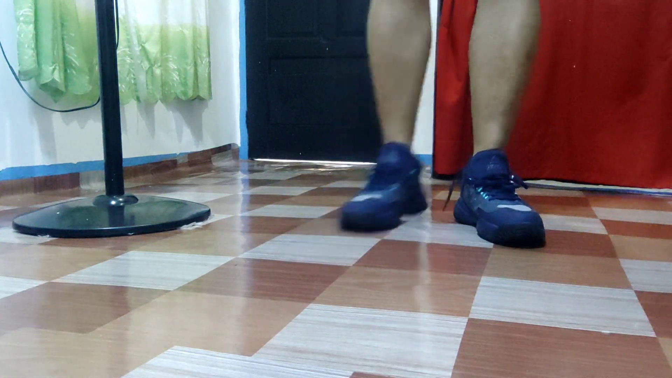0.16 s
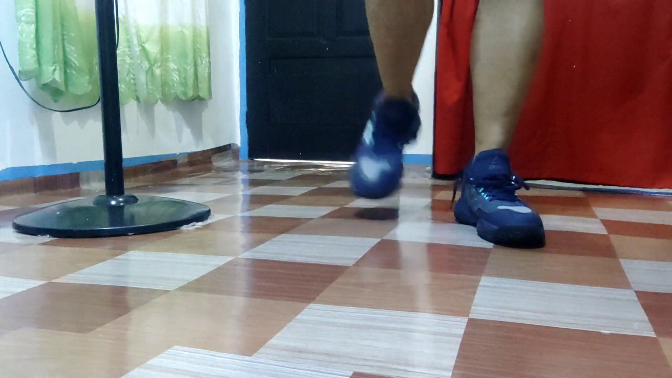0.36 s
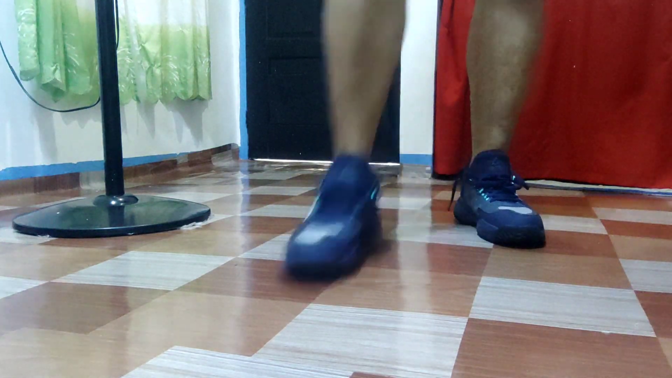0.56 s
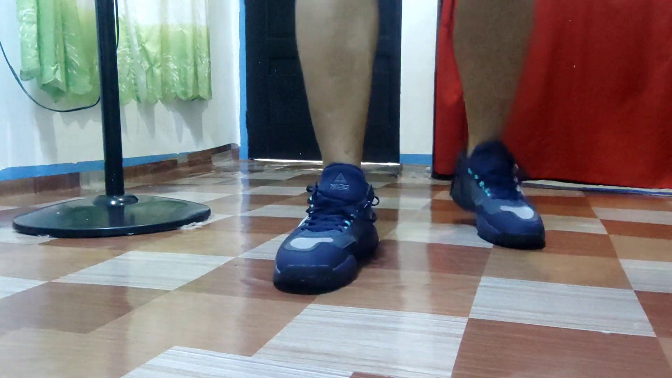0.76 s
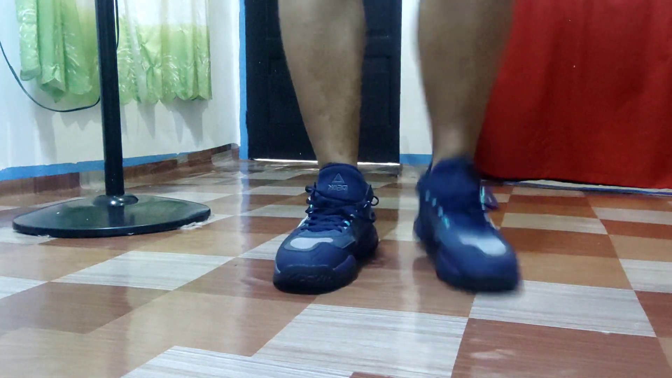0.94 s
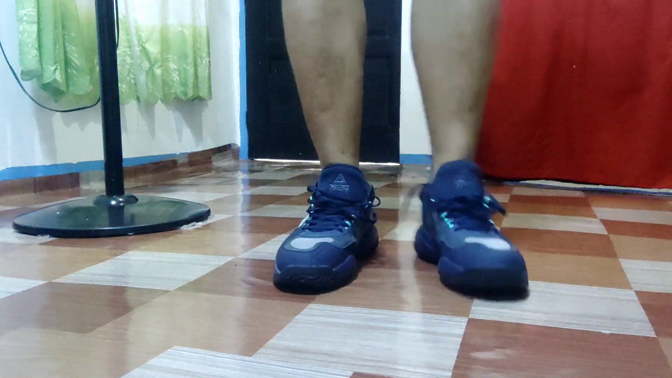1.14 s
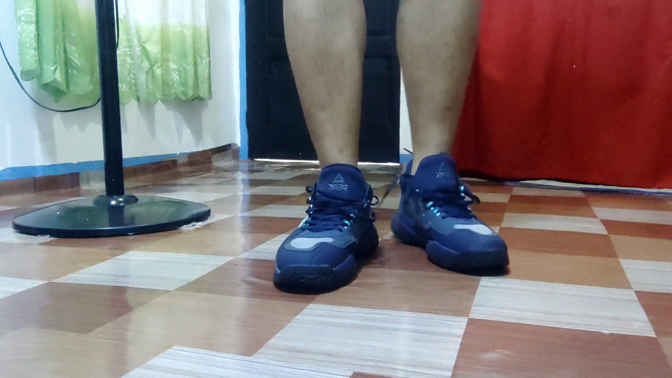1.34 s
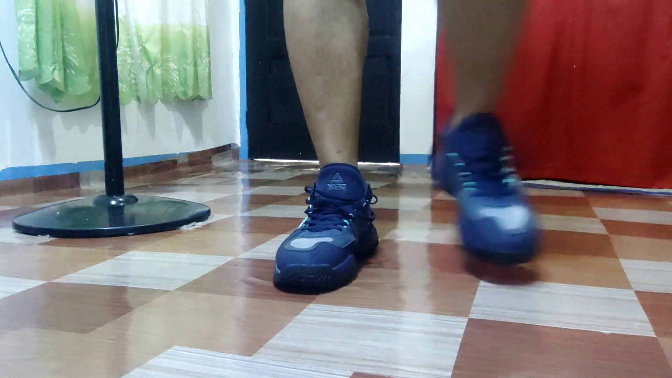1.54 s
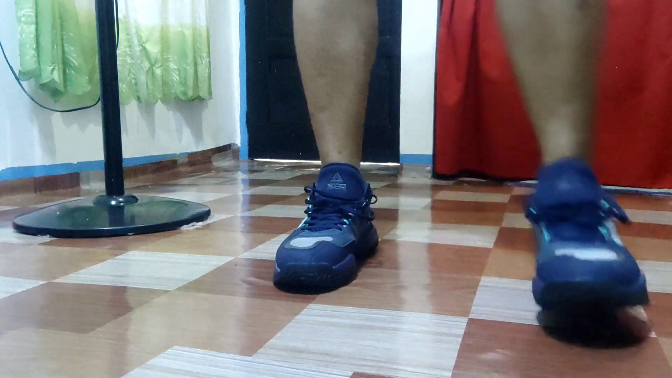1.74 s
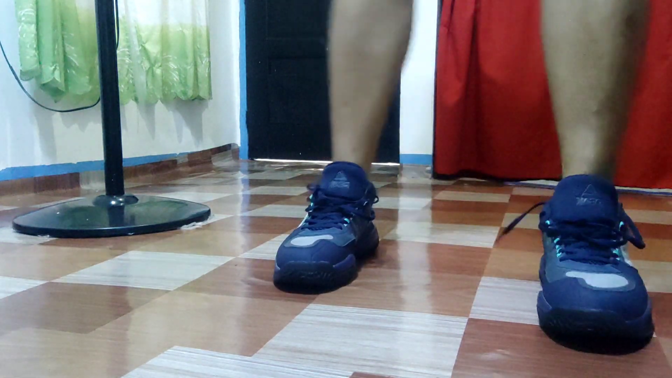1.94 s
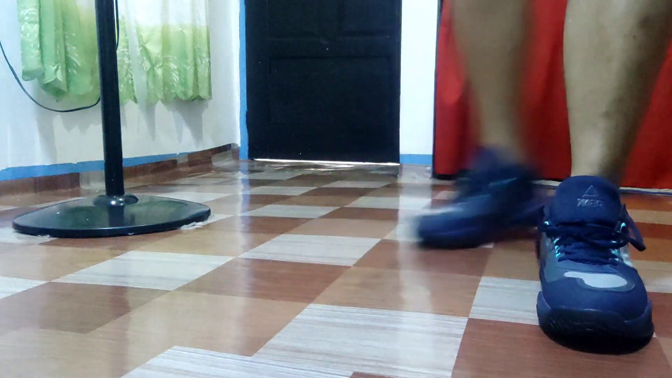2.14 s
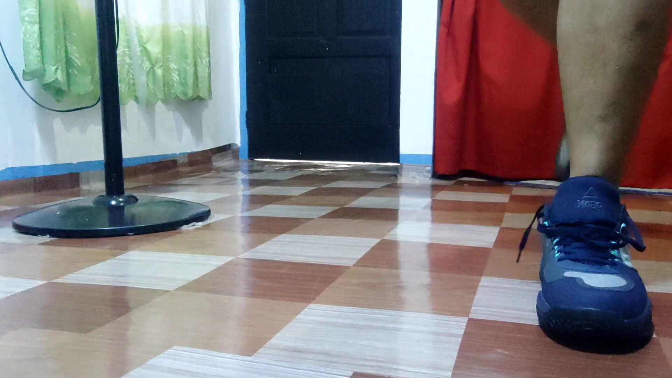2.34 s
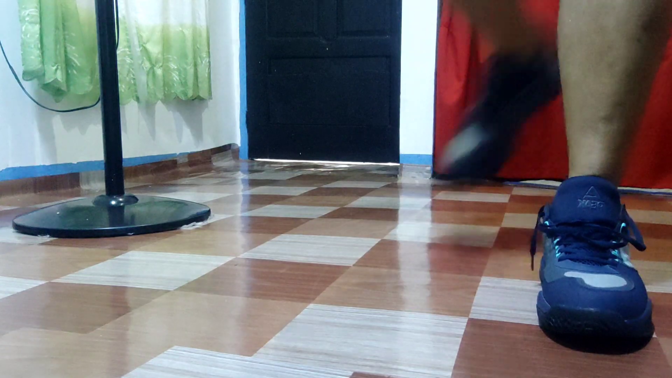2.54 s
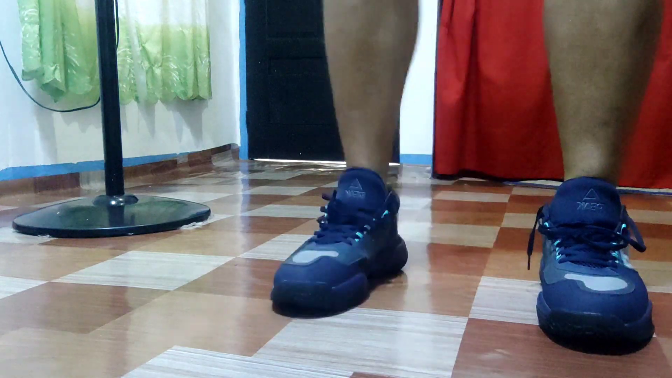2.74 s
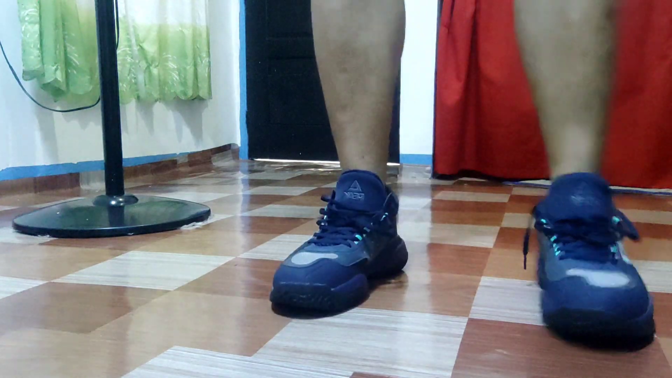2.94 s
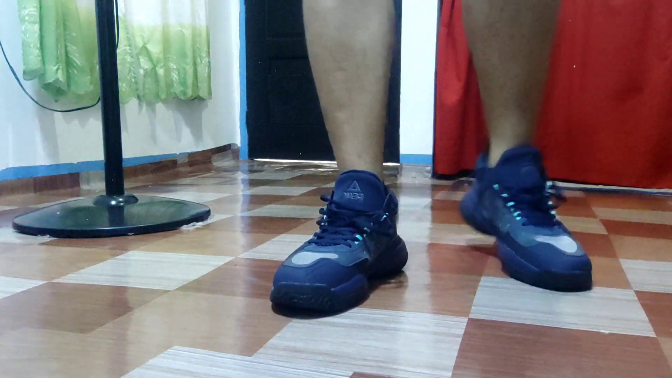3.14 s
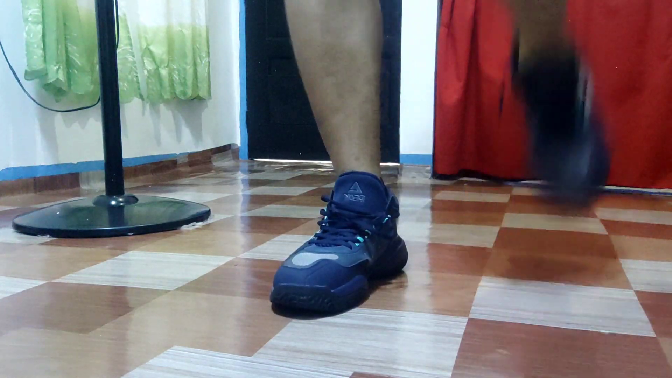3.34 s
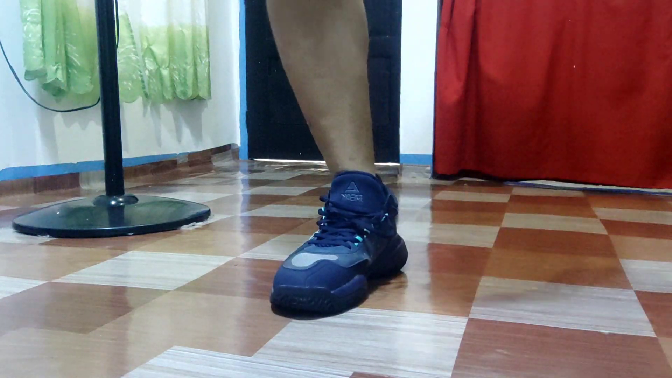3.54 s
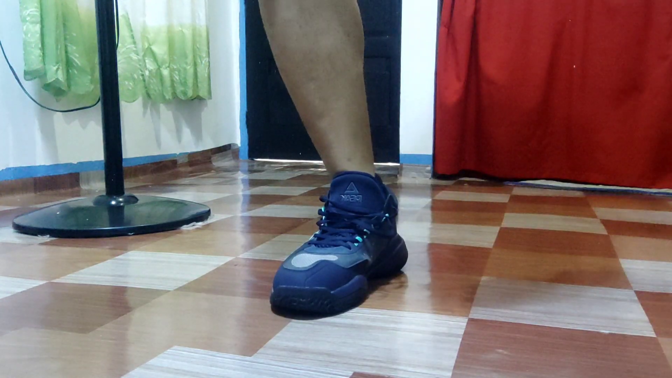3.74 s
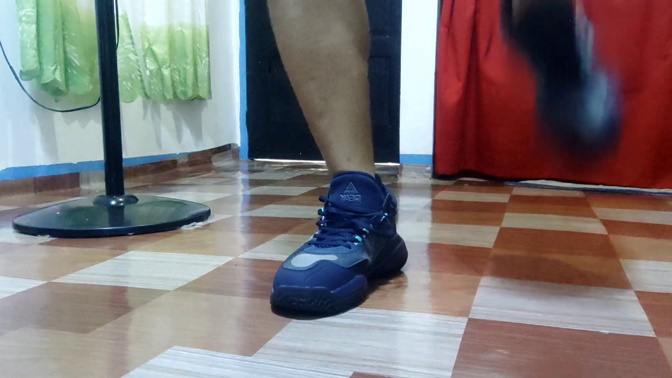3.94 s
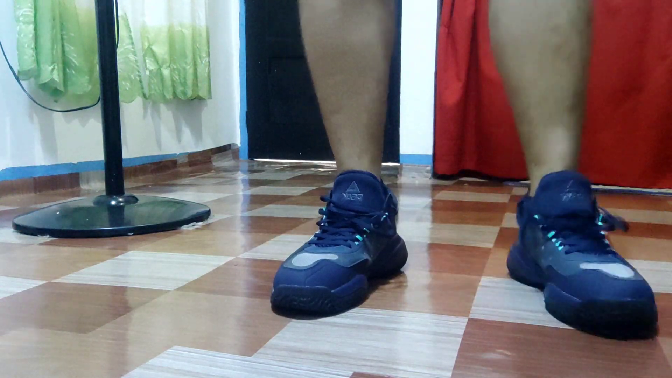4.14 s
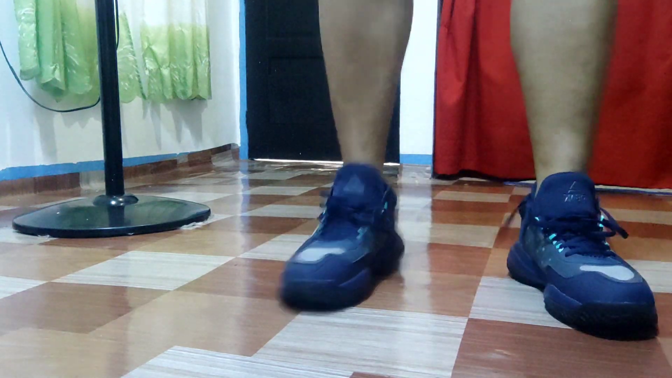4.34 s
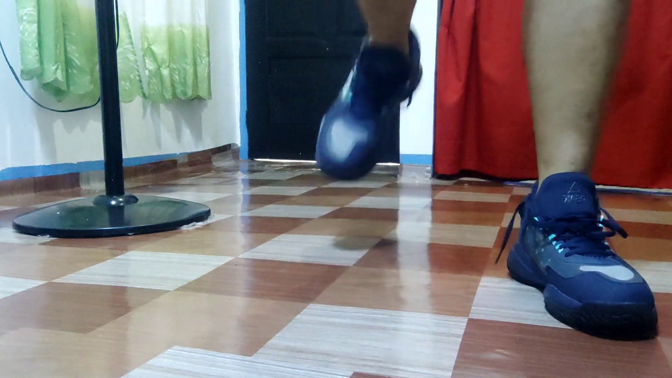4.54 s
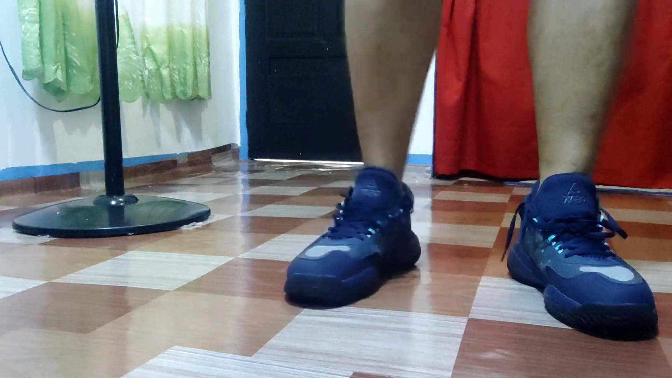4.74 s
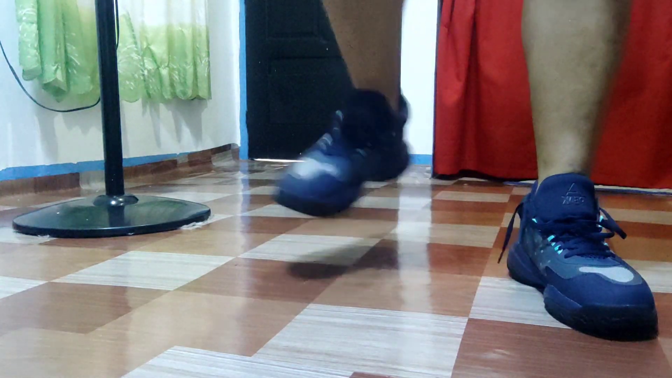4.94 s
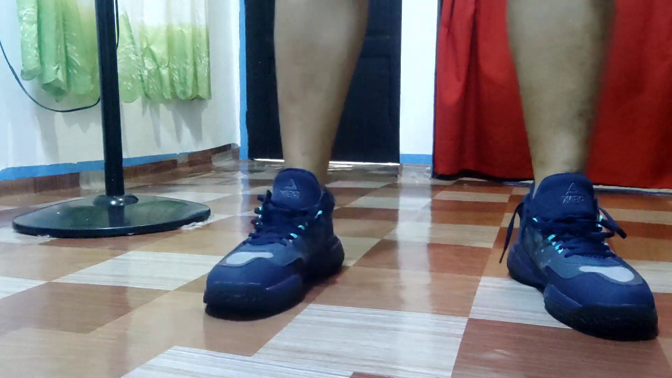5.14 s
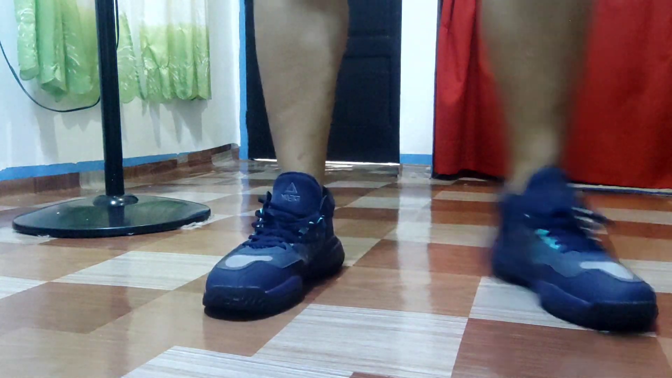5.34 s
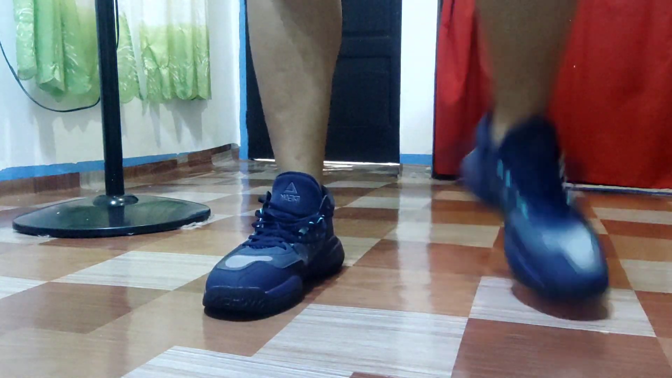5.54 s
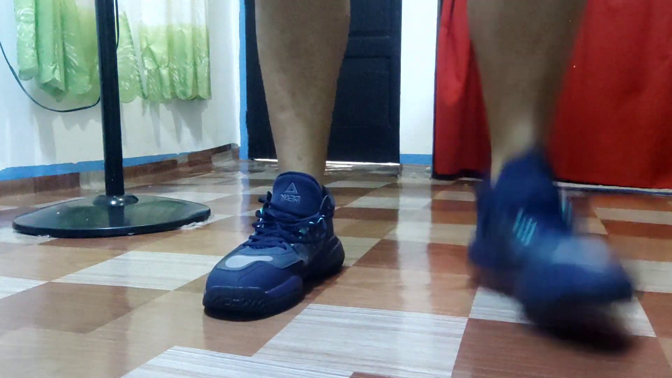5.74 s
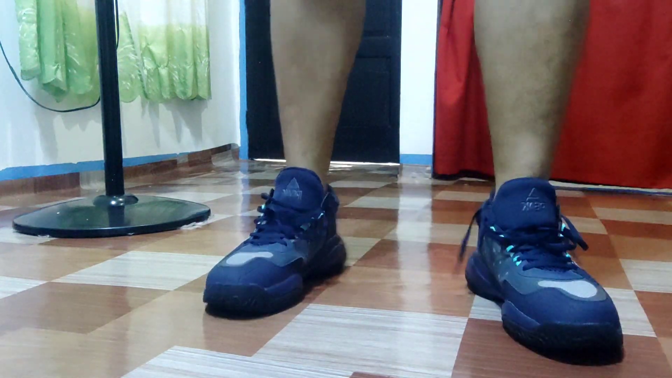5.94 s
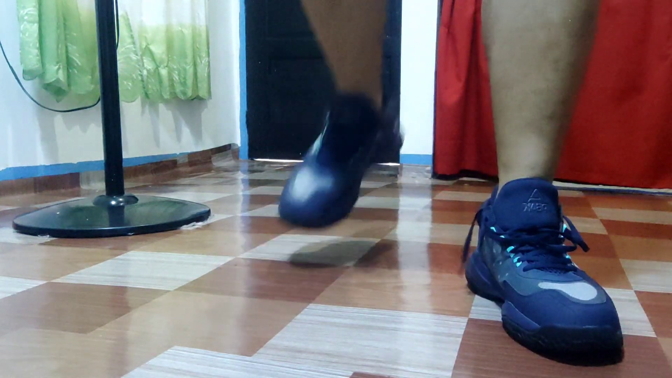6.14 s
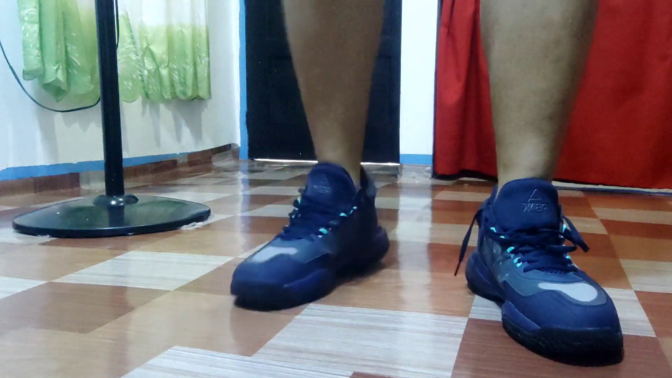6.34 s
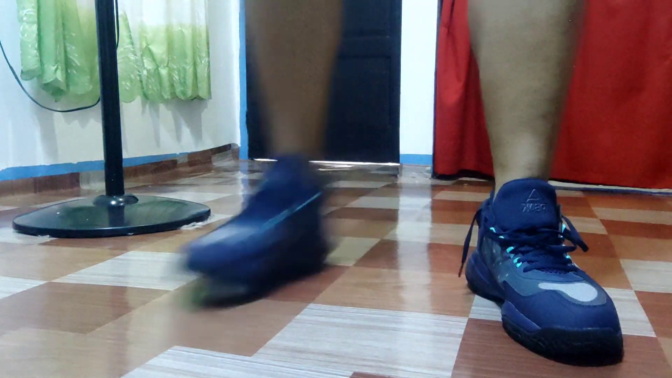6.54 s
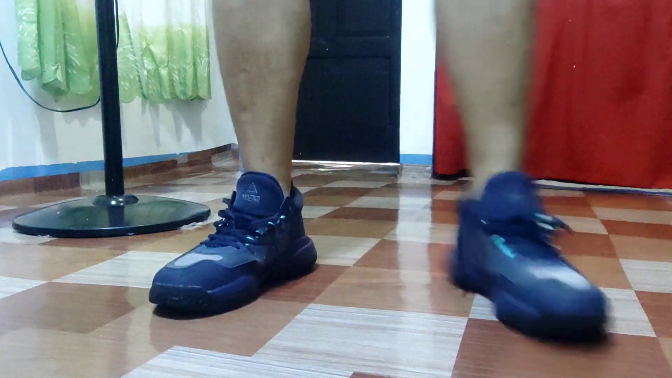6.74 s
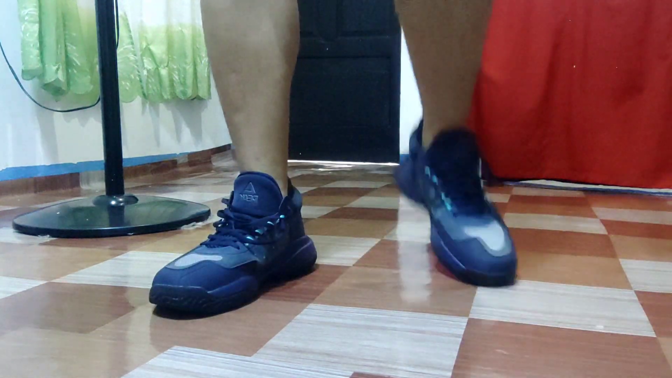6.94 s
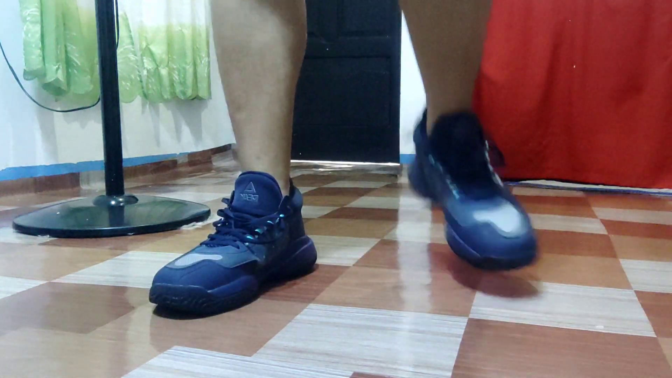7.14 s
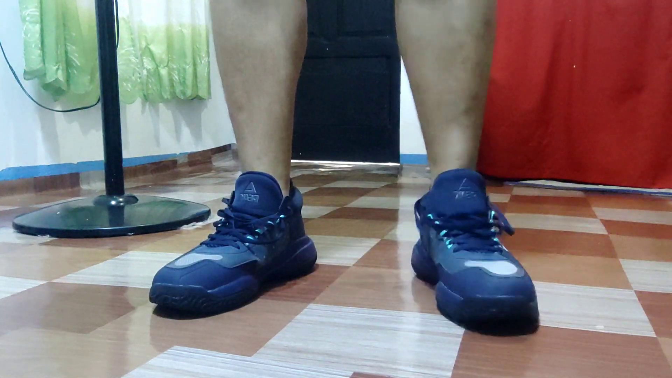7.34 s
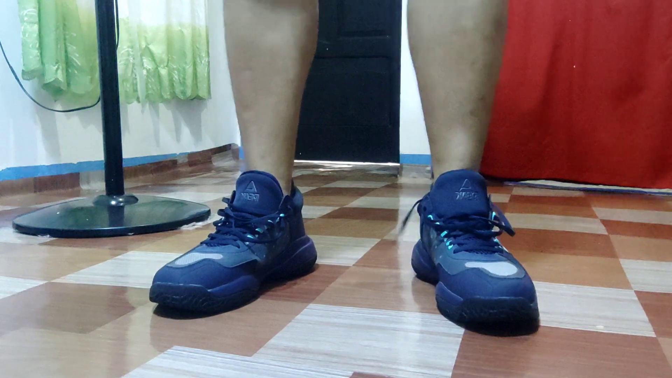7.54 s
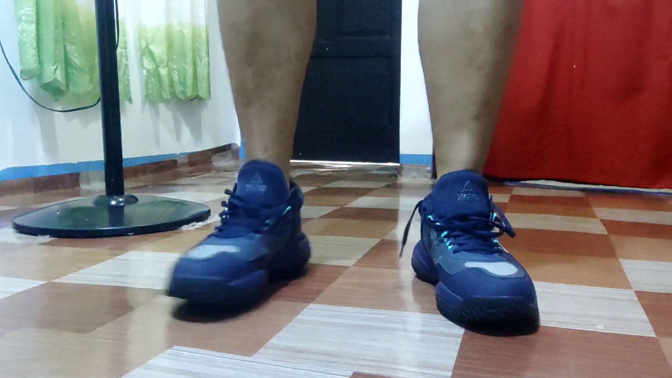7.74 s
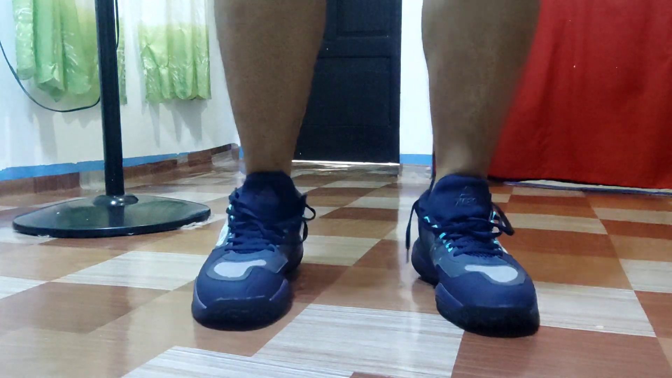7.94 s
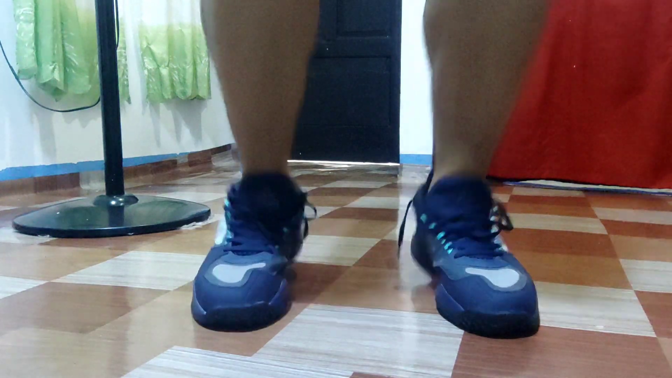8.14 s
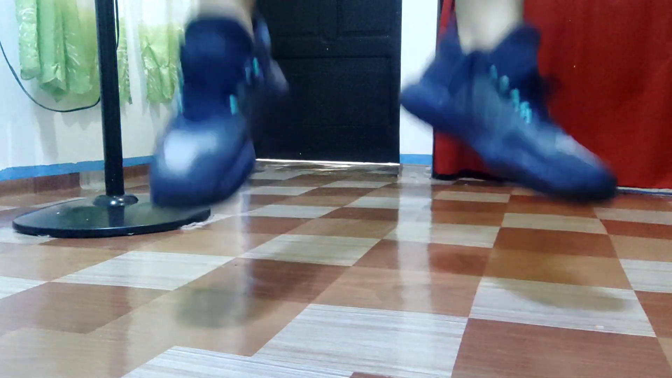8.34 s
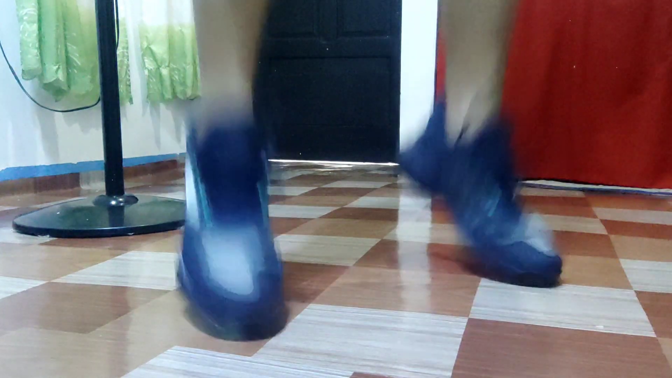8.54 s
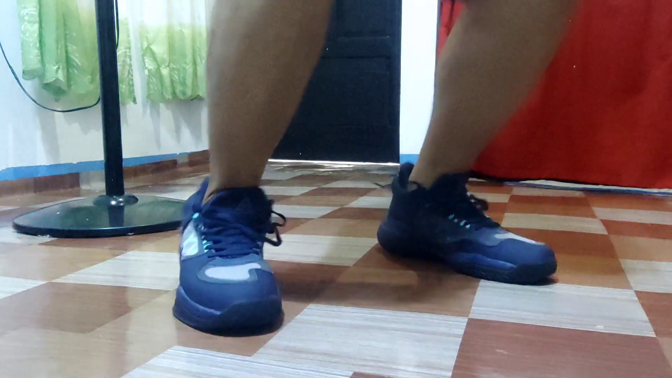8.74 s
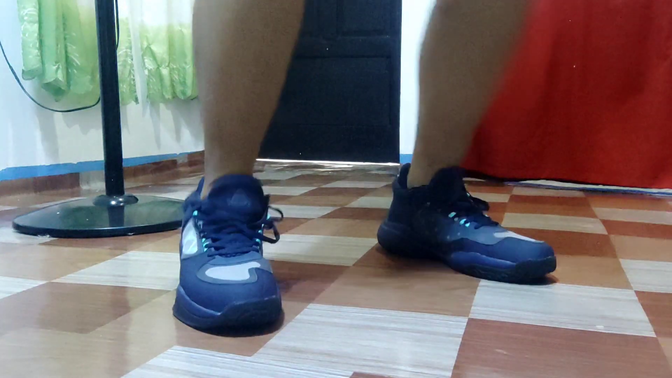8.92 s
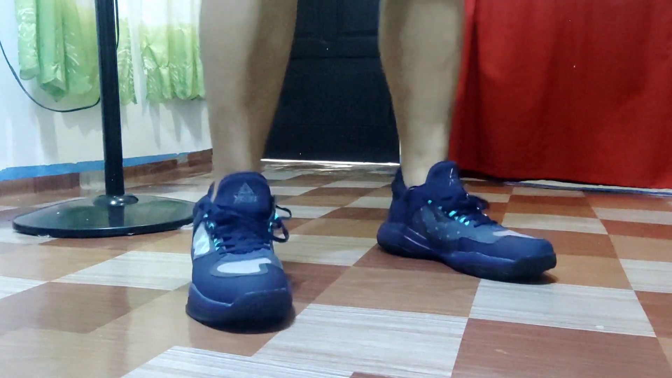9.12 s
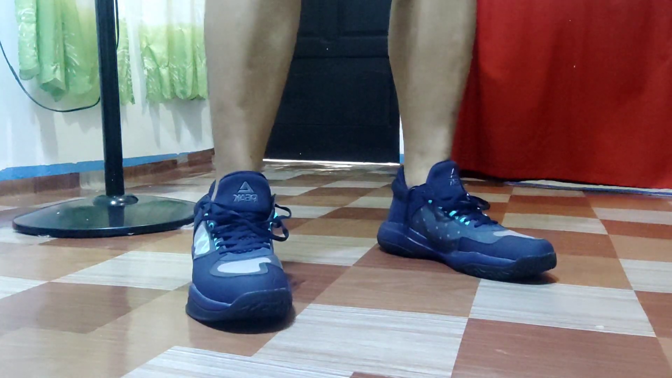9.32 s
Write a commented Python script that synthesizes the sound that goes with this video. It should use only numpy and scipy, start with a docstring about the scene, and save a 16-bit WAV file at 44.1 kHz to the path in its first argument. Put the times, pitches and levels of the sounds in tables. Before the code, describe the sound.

Sneakers step and scuff on a smooth indoor floor, their rubber soles giving short, shrill squeaks, close by in a small room.

```python
"""A basketball shoe slaps down on a glossy floor, close by, in a small hard-walled room.
Steps, pivots and jumps follow: each impact of the sole gives a slap, a knock and a low thump.
Where the rubber grips, stick-slip friction makes shrill chirps; where it slides, the tread scuffs.
The walls reverberate, a motor hums under the room's hiss, and a faint, distant whine comes and goes."""
import sys
import numpy as np
from scipy import signal
from scipy.fft import rfft, irfft
from scipy.io import wavfile
from scipy.ndimage import uniform_filter1d, minimum_filter1d

SR = 44100
rng = np.random.default_rng(int(sys.argv[2]) if len(sys.argv) > 2 else 0)


def store_pcm(level_fs):
    """Save levels as 16-bit WAV."""
    pcm = np.round(np.clip(level_fs, -1, 1) * 32767).astype(np.int16)
    wavfile.write(sys.argv[1], SR, np.atleast_2d(pcm).T)


N = 418068

# Weight of a squeak's harmonics by where they fall: frequency_hz, gain_db
SQUEAK_SPECTRUM = [(4500, 3), (7000, 4), (8200, 5.5), (8800, 13.5), (10200, 2), (11500, 2.5), (13200, -5),
                   (15000, -22)]
# Head start of each shoe's squeaks at the left microphone: shoe, lead_samples
LEFT_LEAD = {"left": -0.96, "right": 3.1}
# Shoe squeaks and, at 1.171 s, a faint shrill tone that lingers after a loud one as the gain recovers:
# start_s, shoe, length_s, level_db, pitch_hz, glide_hz,
# tilt_db_per_harmonic, roughness_ratio, left_minus_right_db
SHRILL_TONES = [ (0.196, "left", 0.021, -20, 3706, -650, -10.5, 0.45, -1),
                (.670, "left", 0.0062, 3.5, 3444, -75, 1, 0.34, 1),
                (1.045, "right", 0.011, 0, 3595, -160, 1, 0.31, -5.5),
                (1.066, "right", 0.017, 3.5, 3824, 128, 3.5, 0.37, 1.5),
                (1.171, "right", 0.078, -30.5, 3765, -55, 2.5, .5, -7.5),
                (1.333, "right", 0.034, -13.5, 4100, -40, -9.5, 0.22, -1.5),
                (2.166, "left", 0.026, -6.5, 3526, -130, 1, 0.22, -4),
                (2.293, "left", 0.033, -13.5, 3640, 36, -3, .5, 1.5),
                (3.173, "right", 0.032, -16, 3864, 32, -4, .27, -0.5),
                (3.822, "right", 0.046, -20.5, 4400, -5, -3, 0.29, -2.5),
                (4.175, "right", 0.0066, -9, 3600, 600, -1, 0.56, -2),
                (4.805, "left", 0.017, -10, 3502, 0, -3.5, 0.56, 3),
                (6.394, "left", 0.0207, -12, 3414, -330, -.5, 0.46, 1.5),
                (6.903, "right", 0.0195, -16, 4000, -500, -4, .45, -1),
                (6.92, "right", 0.025, -6, 3700, -150, 1.5, .32, -.5)]
def squeaks(attack_s=0.0053, release_s=0.0067, sag_db=3.5, arch_hz=58, size=4096):
    """Stick-slip friction: tread ribs catch and release periodically; ribs of unequal pitch beat.
    The faint lingering tone is no new squeak and only shares their timbre."""
    jitter, jitter_hz, flutter_db, flutter_hz = 0.07, 500, 6, 250  # uneven grip shakes pitch and level
    rib_detune, side_rib_db, rasp_db = 0.1, -3, -17
    out, t, harmonics = np.zeros((2, N)), np.arange(size) / SR, np.arange(1, 5)
    for start, shoe, length, db, centre, glide, tilt, rough, pan in SHRILL_TONES:
        progress = np.minimum(t / length, 1)
        pitch = centre + glide * (progress - 0.5) + arch_hz * (np.sin(np.pi * progress) - 2 / np.pi)
        weights = amp(curve_at(SQUEAK_SPECTRUM, centre * harmonics) + tilt * (harmonics - 0.5))
        chirp = amp(rasp_db) * rough * colour(rng.standard_normal(size), FRICTION_SPECTRUM)
        for rib in (-1, 0, 1):  # lower, main and higher rib
            hz = pitch * (1 + rough * (rib_detune * rib + jitter * wander(size, jitter_hz)))
            cycles = (np.cumsum(hz) + np.outer([LEFT_LEAD[shoe], 0], hz)) / SR + rng.random()
            slips = sum(w * np.sin(2 * np.pi * k * cycles) for k, w in zip(harmonics, weights))
            flutter = amp(flutter_db * rough * wander(size, flutter_hz))
            chirp = chirp + slips * flutter * (rough * amp(side_rib_db) if rib else 1)
        envelope = np.clip(t / attack_s, 0, 1) * np.clip((length - t) / release_s + 0.5, 0, 1)
        envelope *= amp(-sag_db * progress)  # a squeak weakens as the foot slows
        chirp *= envelope
        chirp *= np.linalg.norm(envelope) / np.linalg.norm(chirp[0])  # energy independent of roughness
        add(out, start, chirp * amp([[db + pan / 2], [db - pan / 2]]))
    return out


# Treble, midrange and bass responses of the sole on the floor: frequency_hz, density_db
SLAP_SPECTRUM = [(800, -25), (2200, -16.5), (3600, -15.5), (5200, 1), (7000, 3), (8600, 13.5), (10000, 8),
                 (11700, 14.5), (14000, -1.5), (16000, -20)]
KNOCK_SPECTRUM = [(200, -34), (450, -6), (650, 5.5), (1000, 1.5), (1500, -1.5), (2600, -4.5), (4000, -8),
                  (9000, -59.5)]
THUMP_SPECTRUM = [(15, -14), (40, -3.5), (100, -7.5), (140, -3.5), (190, -3), (260, 1), (350, -5.5),
                  (470, -3), (650, -27), (1500, -36.5)]
# Steps rolling from the edge of the sole to its flat:
# start_s, roll_s, flat_over_edge_db, slap_db, knock_db, thump_db, thud_hz
STEPS = [ (.003, 0.0064, -6, 5.5, 3.5, -1.5, 248), (.656, .013, 7, 2, -3.5, -14, 226),
         (1.031, 0.0028, -16.5, -3, -3.5, -20.5, 380), (2.771, .009, 7, 3, -6.5, -9.5, 221),
         (4.174, 0.0034, 7.5, 9, 0.5, 1.5, 162), (4.795, .007, -2.5, 3.5, -2.5, -5, 269),
         (5.154, .018, -1.5, 3, -1, -2.5, 188), (5.872, .0125, 2, 7, 4, 1.5, 432),
         (6.385, .008, 1.5, .5, -7, -9, 210), (6.663, 0.014, 7.5, 6, -2.5, -1.5, 197),
         (7.369, 0.025, 5, 3.5, -4.5, -5.5, 247), (7.914, 0.0053, 8, -5.5, -13, -16, 250)]
# Taps of toe or heel: start_s, slap_db, knock_db, thump_db, settle_s
TAPS = [ (2.800, -4, -19, -8.5, 0.0027), (3.094, -13, -17, -17, 0.012), (3.636, -9.5, -35, -22, 0.0046),
        (4.41, -10.5, -21.5, -23.5, 0.0044), (6.083, -4, -20, -40, 0.0009),
        (6.841, -11.5, -13.5, -14, .004), (8.669, -1, -8.5, -15, 0.00084), (8.681, 2.5, -34, -33, 0.0027),
        (8.775, -7.5, -17.5, -17, 0.011), (9.207, -12, -20.5, -12.5, 0.011)]
def footfalls(edge_settle_s=0.0021, flat_settle_s=0.0034, tap_thud_hz=177):
    """Impact excitation: a step divides its energy between two blows to the floor; a tap is one blow."""
    drive = np.zeros((4, N))
    flat_bias_db = np.array([0, 2.5, -0.5])  # slap, knock, thump
    for start, roll, flat_db, slap, knock, thump, hz in STEPS:
        flat_ratio = amp(flat_db + flat_bias_db)
        edge = amp([slap, knock, thump]) / np.hypot(1, flat_ratio)
        add(drive, start, impact(edge, hz, edge_settle_s))
        add(drive, start + roll, impact(edge * flat_ratio, hz, flat_settle_s))
    for start, slap, knock, thump, settle in TAPS:
        add(drive, start, impact(amp([slap, knock, thump]), tap_thud_hz, settle))
    slap, knock, thump, thud = drive
    return (colour(slap, SLAP_SPECTRUM) + colour(knock, KNOCK_SPECTRUM)
            + colour(thump, THUMP_SPECTRUM) + thud)


def impact(gains, thud_hz, settle_s, decay_cycles=0.37, patter=0.95, touch=0.52, size=4096):
    """An impulse, then a patter of settling tread blocks; the cushion thuds as a damped oscillator."""
    t, (slap, knock, thump) = np.arange(size) / SR, gains
    blocks = rng.standard_normal(size) * (rng.random(size) < 0.25) * np.exp(-t / max(settle_s, 1e-3))
    force = patter * blocks / np.linalg.norm(blocks)
    force[0] = -touch
    cycles = thud_hz * t
    thud = -np.sin(2 * np.pi * cycles) * np.exp(-cycles / decay_cycles) * np.minimum(cycles, 1)
    return np.array([slap * force, knock * force, thump * force, thump * thud / np.linalg.norm(thud)])


# Noise of rubber rubbing on the floor: frequency_hz, density_db
FRICTION_SPECTRUM = [(1000, -59), (2500, -2.5), (4000, -5), (5500, -0.5), (7300, 3), (8800, 15),
                     (10000, 5.5), (11700, 13.5), (14000, -2), (16000, -46)]
# Slides of the tread: start_s, length_s, level_db, rasp_over_hiss_db
SCUFFS = [ (0.17, 0.055, -36.5, -9), (0.248, 0.097, -38, -17), (1.295, .09, -34.5, -14.5),
          (2.063, 0.025, -42.5, -9), (2.143, 0.065, -33.5, -13.5), (2.27, .067, -30.5, -21),
          (2.785, 0.033, -31.5, -9), (3.04, 0.032, -41, -19), (3.132, 0.066, -37.5, -15.5),
          (3.633, .028, -35.5, -1.5), (3.783, 0.16, -31, -16.5), (3.961, 0.059, -33.5, -21),
          (4.189, 0.037, -29.5, -30), (4.274, .039, -37, -9), (5.271, 0.035, -42, 3),
          (5.397, 0.041, -38.5, -9), (6.792, 0.031, -40.5, -9.5), (6.877, 0.061, -37.5, -15),
          (7.745, 0.021, -47, -11), (8.259, 0.089, -40.5, -11.5), (8.785, 0.046, -39.5, -10.5),
          (9.168, .13, -52, 0)]
def scuffs(swell_share=0.44, grain_db=3.0, grain_hz=500):
    """Sliding friction: a grainy hiss and a lower rasp swell as the foot speeds up, then fade."""
    t, hiss, rasp = np.arange(N) / SR, np.zeros(N), np.zeros(N)
    for start, length, db, rasp_db in SCUFFS:
        near = abs(t - start) < 0.4
        from_peak = (t[near] - start) / length - swell_share
        width = np.where(from_peak < 0, swell_share, 1 - swell_share)
        stroke = amp(db) * np.exp(-0.5 * (from_peak / width) ** 2)
        hiss[near] += stroke
        rasp[near] += stroke * amp(rasp_db)
    grains = unit_rms(rng.standard_normal(N) * amp(grain_db * wander(N, grain_hz)))
    return colour(grains * hiss, FRICTION_SPECTRUM) + colour(grains * rasp, KNOCK_SPECTRUM)


# Reverberation time of the room: frequency_hz, t60_s
REVERB_TIMES = [(120, 0.21), (320, 0.51), (900, 0.44), (2200, 0.54), (3800, 0.47), (7500, 0.36),
                (12000, 0.26)]
def reverberation(x, gap_s=0.0008, early_s=0.019, size=28000):
    """Multiple reflection: strong early echoes thicken into a tail; each band decays at its own rate."""
    t = np.arange(size) / SR
    density = np.clip(0.02 + 4 * t, 0, 1)
    echoes = rng.choice([-1., 1.], (2, size)) * (rng.random((2, size)) < density) / np.sqrt(density)
    echoes *= np.clip(t / gap_s - 1, 0, 1) * (1 + np.exp(-t / early_s))
    hz, age_s, bands = signal.stft(diffuse_field(echoes), SR, nperseg=256)
    decay = amp(-60 * age_s / curve_at(REVERB_TIMES, hz)[:, None])
    tail = signal.istft(bands * decay, SR)[1]
    return signal.oaconvolve(x, tail / np.linalg.norm(tail[0]), axes=1)[:, :N]


# Modes of the air between the walls: pitch_hz, relative_gain_db, t60_s
ROOM_MODES = [(120, -7.5, 1), (160, -8, 0.5), (213.3, 2.5, 0.39), (278, -11, 1), (490, -29, 0.33)]
def standing_waves(x, level_db=-3, size=22000):
    """Modal resonance: footfalls set the room's air ringing at a few low pitches."""
    t, ring = np.arange(size) / SR, np.zeros(size)
    for hz, db, t60 in ROOM_MODES:
        unity_at_resonance = 2 * np.log(1000) / (t60 * SR)
        ring += unity_at_resonance * amp(db - 60 * t / t60) * np.sin(2 * np.pi * hz * t)
    return amp(level_db) * signal.oaconvolve(x, ring)[:N]


# Swells of a faraway tone: start_s, length_s, level_db, pitch_hz
WHINES = [(0.963, 0.064, -41.5, 840), (5.42, 0.1, -38.5, 873), (5.506, 0.13, -39.5, 854),
          (5.62, 0.14, -53, 846), (5.742, 0.07, -38, 848), (5.805, 0.069, -40, 850),
          (9.25, .11, -49.5, 823)]
def distant_whine(sag_hz_per_s=82, waver=0.023, waver_hz=85):
    """Amplitude and frequency modulation: a thin tone swells, wavers and sinks slightly in pitch."""
    out, drift = np.zeros(N), wander(N, waver_hz)
    for start, length, db, hz in WHINES:
        t = np.arange(0, length, 1 / SR)
        pitch = hz - sag_hz_per_s * (t - length / 2)
        pitch *= 1 + waver * drift[round(start * SR):][:len(t)]
        swell = amp(db) * np.sqrt(2) * np.sin(np.pi * t / length)
        add(out, start, swell * np.sin(2 * np.pi * np.cumsum(pitch) / SR))
    return out


# Partials of the motor: pitch_hz, level_db
MOTOR_PARTIALS = [(71, -48.5), (213, -64.5)]
def motor_hum(throb_db=2.0, throb_hz=4.6):
    """Periodic vibration: a motor's fundamental and third harmonic, each throbbing irregularly."""
    t = np.arange(N) / SR
    return np.sqrt(2) * sum(amp(db + throb_db * wander(N, throb_hz)) * np.sin(2 * np.pi * hz * t)
                            for hz, db in MOTOR_PARTIALS)


# Ambient noise of the room: frequency_hz, density_db
HISS_SPECTRUM = [(15, 22), (40, 1), (85, 9), (120, -1.5), (160, -0.5), (270, 2), (370, -4.5), (750, -1.5),
                 (2200, -5), (5500, -13), (7500, -10.5), (8700, -3.5), (11700, -7.5), (14300, -18)]
def room_hiss(level_db=-42):
    """Stationary broadband noise arrives from all sides as a diffuse field."""
    pair = np.array([colour(noise, HISS_SPECTRUM) for noise in rng.standard_normal((2, N))])
    return amp(level_db) * diffuse_field(pair)


# Likeness of diffuse sound at the two microphones: frequency_hz, coherence_ratio
COHERENCE = [(30, 0), (100, 0.93), (250, 0.85), (500, 0.61), (1000, 0), (2000, 0), (15000, 0)]
def diffuse_field(pair):
    """Spatial coherence: two nearby points receive similar long waves but unrelated short ones."""
    left, other = rfft(pair)
    shared = np.clip(curve_at(COHERENCE, np.fft.rfftfreq(pair.shape[1], 1 / SR)), -1, 1)
    right = shared * left + np.sqrt(1 - shared ** 2) * other
    return irfft(np.array([left, right]), pair.shape[1])


def amp(db):
    """Decibels to amplitude ratio."""
    return 10 ** (np.asarray(db) / 20)


def unit_rms(x):
    """Normalisation to rms 1."""
    return x / np.sqrt(np.mean(x ** 2) + 1e-20)


def curve_at(points, hz):
    """Interpolation on a log-frequency axis."""
    knots_hz, values = np.transpose(points)
    return np.interp(np.log(hz + 1), np.log(knots_hz + 1), values)


def add(mix, start_s, sound):
    """Superposition of a sound onto the mix, in place."""
    part = mix[..., max(0, round(start_s * SR)):][..., :sound.shape[-1]]
    part += sound[..., :part.shape[-1]]


def colour(x, spectrum, size=2048):
    """Minimum-phase filter of unit energy: the spectrum sets only the shape."""
    log_gain = np.log(amp(curve_at(spectrum, abs(np.fft.fftfreq(size, 1 / SR)))))
    taps = np.fft.ifft(np.exp(np.conj(signal.hilbert(log_gain)))).real
    return signal.oaconvolve(x, taps / np.linalg.norm(taps))[:len(x)]


def wander(count, rate_hz):
    """Random modulation: noise of rms 1, low-passed at rate_hz."""
    hz = np.fft.rfftfreq(count, 1 / SR)
    return unit_rms(irfft(rfft(rng.standard_normal(count)) / (1 + (hz / rate_hz) ** 4), count))


def gain_control(x, threshold_db=-11, squeeze=0.51, recovery_db_per_s=90, ceiling=0.88):
    """Dynamic compression ducks the loudest chirps and recovers in their tails; a limiter caps peaks."""
    power_db = 10 * np.log10(abs(uniform_filter1d((x ** 2).mean(0), size=130)) + 1e-12)
    fall_db = np.arange(N) * recovery_db_per_s / SR
    held_db = np.maximum.accumulate(power_db + fall_db) - fall_db
    over_db = np.maximum(held_db - threshold_db, 0)
    x = x * amp(-squeeze * uniform_filter1d(over_db, size=60))
    peak_gain = ceiling / np.maximum(abs(x).max(0), ceiling)
    return x * uniform_filter1d(minimum_filter1d(peak_gain, size=61), size=61)


def scene(squeak_reverb_db=-3):
    """Superposition at two microphones on the floor: direct sound, the room's response, background."""
    chirps, steps, slides = squeaks(), footfalls(), scuffs()
    soles = steps + slides
    direct = chirps + np.array([np.pad(soles, (1, 0))[:N], soles])  # soles reach the left a sample later
    reflected = reverberation(amp(squeak_reverb_db) * chirps + soles) + standing_waves(steps)
    return direct + reflected + distant_whine() + room_hiss() + motor_hum()


# Imbalance of the two microphone ports: frequency_hz, left_minus_right_db
PORT_BALANCE = [(50, 4.5), (160, -1), (2500, -0.5), (4000, -1), (5500, -1), (7200, -4), (9000, -13.5),
                (10800, 13.5), (14000, 7)]
def record(dry, cutoff_hz=14550):
    """Frequency response: the ports colour each side differently; gain control and a low-pass follow."""
    balance = amp(curve_at(PORT_BALANCE, np.fft.rfftfreq(N, 1 / SR)))
    ports = np.array([balance, np.ones_like(balance)]) * np.sqrt(2 / (1 + balance ** 2))  # constant power
    heard = irfft(rfft(dry) * ports, N)
    lowpass = signal.firwin(201, cutoff_hz, window=("kaiser", 8), fs=SR)
    return signal.oaconvolve(gain_control(heard), lowpass[None], "same")


dry = scene()
out = record(dry)
store_pcm(out)
```